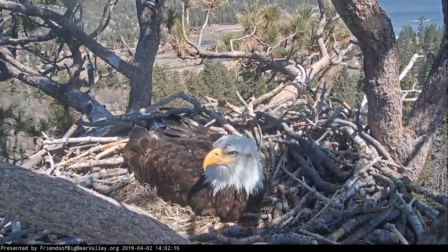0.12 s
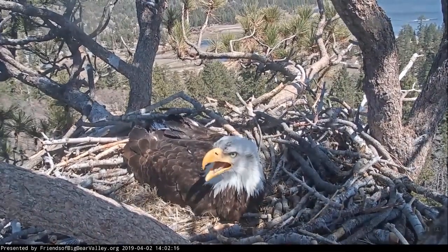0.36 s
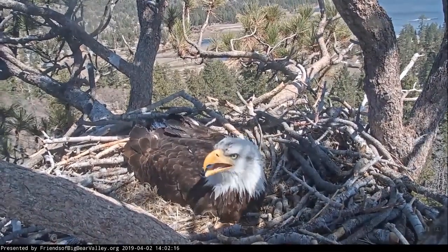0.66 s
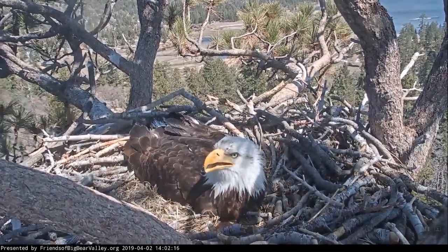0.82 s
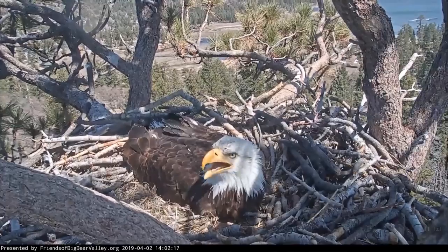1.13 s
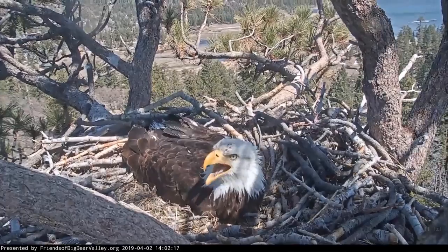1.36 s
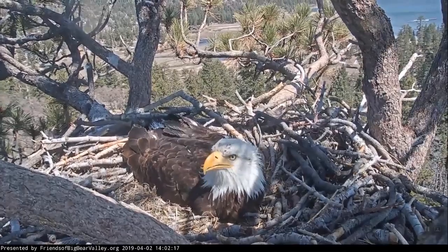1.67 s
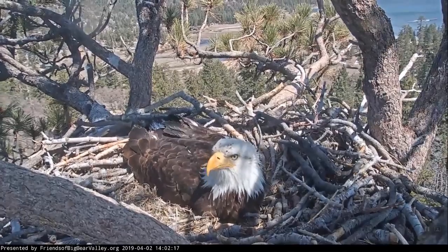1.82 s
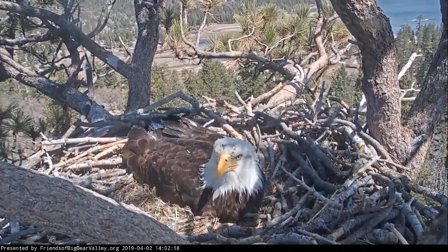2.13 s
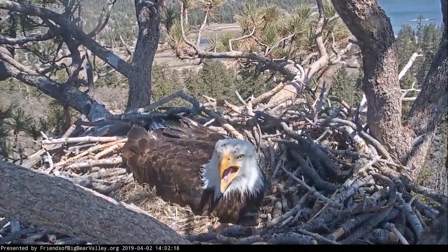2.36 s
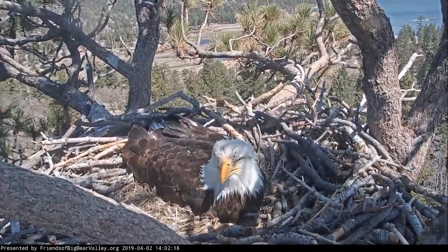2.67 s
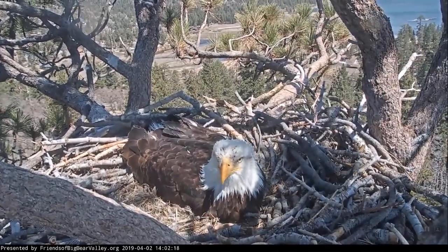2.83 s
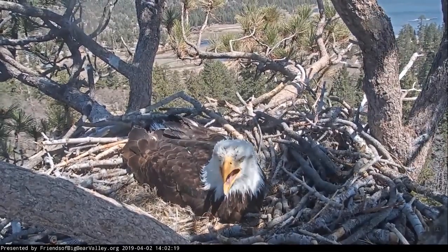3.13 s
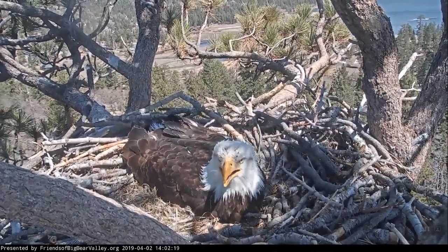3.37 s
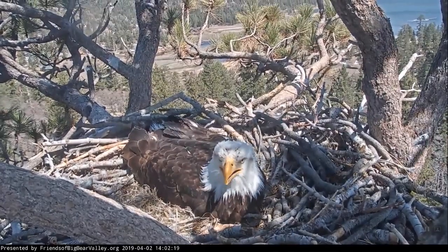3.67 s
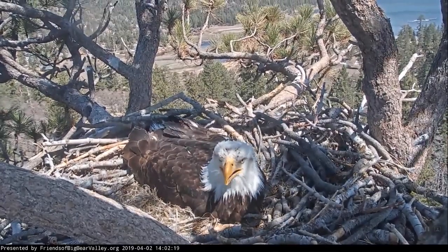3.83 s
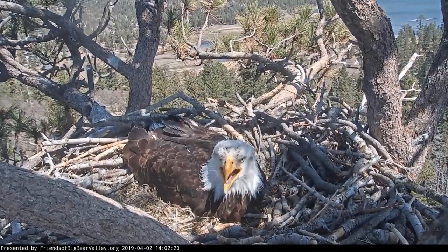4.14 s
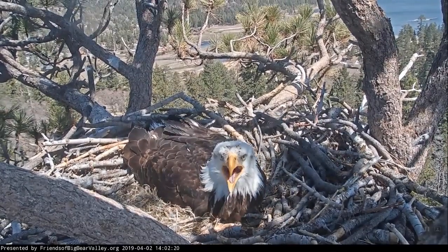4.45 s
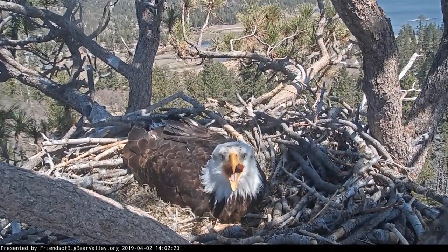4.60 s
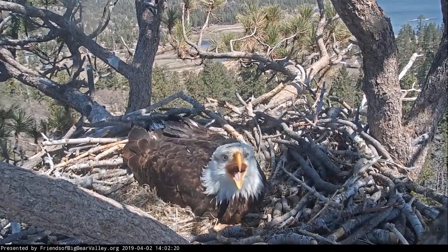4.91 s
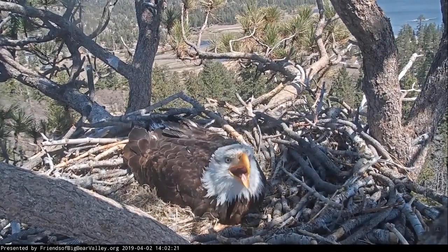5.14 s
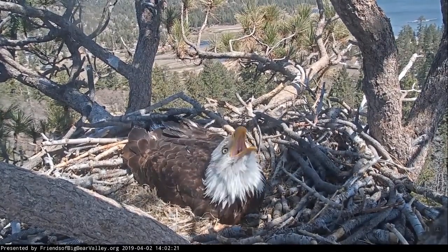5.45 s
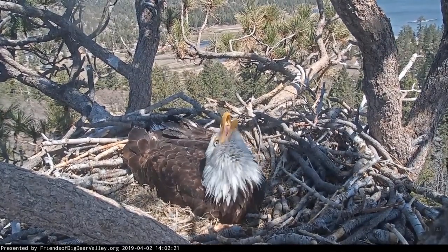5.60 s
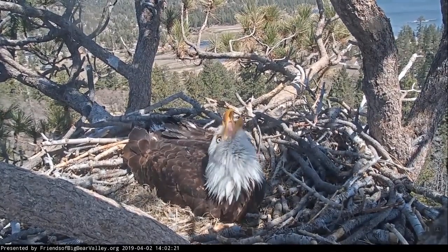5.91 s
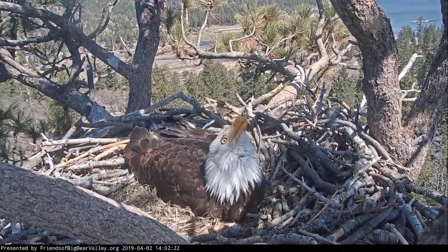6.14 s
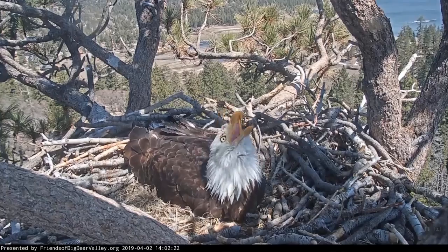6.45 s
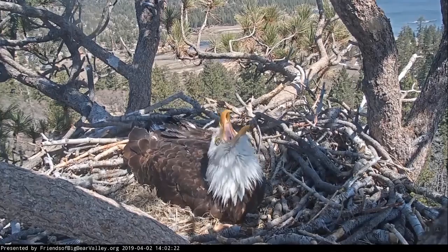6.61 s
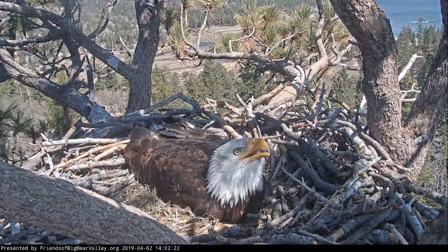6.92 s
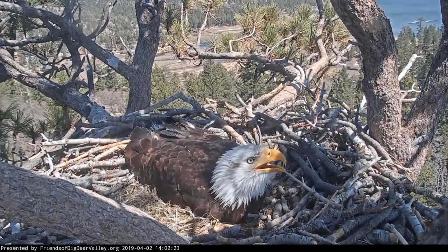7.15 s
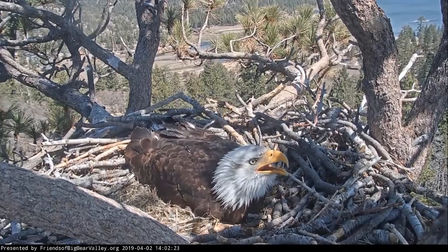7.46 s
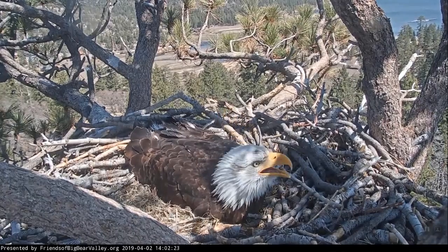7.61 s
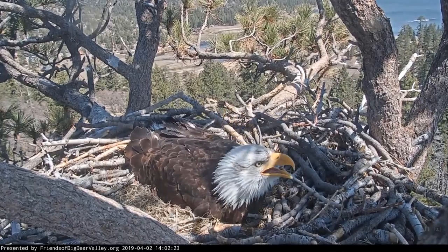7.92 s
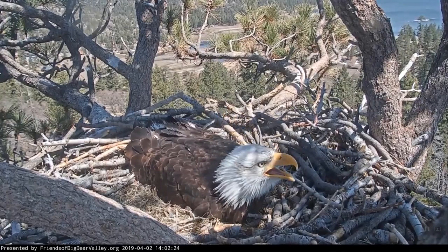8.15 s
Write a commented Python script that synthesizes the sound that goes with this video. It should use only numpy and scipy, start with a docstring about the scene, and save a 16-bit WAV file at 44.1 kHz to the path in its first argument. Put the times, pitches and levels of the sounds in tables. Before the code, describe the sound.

Over faint hiss, loud piercing eagle screams alternate with soft yips and peeps, then sharp chittering and three rattling squeals follow.

```python
"""A treetop nest in the open air: bald eagles heard through a small microphone, over faint hiss and low rumble.
One gives four loud screams that start hoarse and split to the octave below, climb, clear and drop; low yips fall among the calls.
Thin peeps are scattered from the second scream on; a raspy chitter with sharp chips, then three squeals that end in dry
rattles, follow the screams, with one dull thump. Voices are summed harmonics, gliding sines, ringing pulses and shaped noise;
hiss and rumble are coloured noise."""
import sys
import numpy as np
from scipy.fft import rfft, irfft, next_fast_len
from scipy.io import wavfile
from scipy.ndimage import uniform_filter1d, minimum_filter1d, map_coordinates

SR = 44100
rng = np.random.default_rng(int(sys.argv[2]) if len(sys.argv) > 2 else 0)


def unload_audio(sound):
    """Save the sound as a 16-bit wav file, at the path given as the first command line argument."""
    columns = np.transpose(np.atleast_2d(sound))
    # keep every value between -1 and 1, then stretch to whole-number steps
    steps = np.round(np.clip(columns, -1, 1) * 32767)
    wavfile.write(sys.argv[1], SR, steps.astype(np.int16))


N = 364707
TOP_HZ = 15650  # upper limit of the output

# Low rumble: wind, with low thumps where the screams overload the microphone.
# Each row: time in seconds, level in dB.
RUMBLE_S_DB = [(.92, -62), (1.02, -45), (1.4, -50.5), (1.53, -40), (1.63, -49), (2, -69), (2.42, -57),
               (2.56, -43), (2.7, -57.5), (3.36, -65), (3.45, -42), (3.54, -75), (5.3, -69.5), (5.55, -61),
               (5.9, -77.5), (7.1, -74.5), (7.8, -63)]
# Spectra of hiss and rumble. Each row: frequency in Hz, gain in dB.
HISS_HZ_DB = [(30, -36.5), (120, -18.5), (300, -16.5), (600, -12), (950, -7), (1250, -17), (1650, -34),
              (2100, -22), (2600, -11), (3200, -6.5), (3700, -20), (4300, -36), (4900, -51.5),
              (15000, -62.5)]
RUMBLE_HZ_DB = [(32, -3.5), (75, -15.5), (200, -24.5), (2000, -79.5)]

# Dull thump: middle in seconds, level in dB, length in seconds.
THUMP_S_DB_S = (5.8, -43, 0.015)

# Cackles, each a squeal that breaks into a rattle. Each row: first pulse in seconds, pulse spacing in seconds,
# level of each ring resonance in dB, its fade over the rattle in dB, squeal base level in dB, rasp level in dB.
CACKLES = [(5.8237, .0129, -21, 13, -48, -43), (6.2005, 0.0141, -25, 11, -44, -45),
           (6.8342, .0142, -21.5, 7, -38.5, -42)]
# Spectra of a cackle's wheeze and a rattle's knock. Each row: frequency in Hz, gain in dB.
CACKLE_HZ_DB = [(100, -30.5), (1000, -15.5), (1650, -26), (2200, -2.5), (2700, 2), (3400, 2.5),
                (4000, -14.5), (4700, -29), (7000, -45), (12000, -71)]
KNOCK_HZ_DB = [(50, -20), (160, 12), (400, 4), (1050, 3.5), (5000, -74.5)]
# Steps of a squeal. Each row: pitch in Hz, gain on the squeal base level in dB,
# middle before the rattle in seconds, length in seconds, pitch scatter as a share.
REGISTERS = [(3100, 3.5, .088, 0.032, 0.033), (4144, 0.5, 0.072, 0.035, 0.0055),
             (5040, -21.5, 0.043, 0.041, .016), (5900, -27.5, 0.033, 0.06, 0.03),
             (6780, -20.5, 0.013, 0.027, 0.04)]
# Wheeze at the start of a squeal: middle before the rattle in seconds, length in seconds, level in dB.
SQUEAL_RASP = (.083, .045, -45.5)
RATTLE_RASP_S, RATTLE_RASP_LAG_S = 0.095, 0.023  # length; middle after the first pulse
KNOCK_DB, KNOCK_FADE_DB = -44.5, 2  # alike in all rattles; fade over the pulses

# Sharp chips of the chitter. Each row: middle in seconds, level in dB, length in seconds.
CHIPS = [(4.964, -34, .018), (4.978, -21.5, 0.018), (5.004, -37, .014), (5.059, -24.5, .007),
         (5.079, -32, .012), (5.089, -34, .007), (5.112, -24, .011), (5.162, -28, .005),
         (5.1665, -22.5, .005), (5.184, -26, .007), (5.1895, -29, 0.005), (5.1993, -31, .004),
         (5.205, -37, .008), (5.295, -30, 0.0084), (5.729, -27.5, .01), (5.743, -32, .008)]
# Wheezy rasps under the chitter. Each row: middle in seconds, length in seconds, level in dB.
RASPS = [(4.986, 0.07, -41.5), (5.075, .056, -39), (5.19, .058, -40.5)]
# Spectrum of the chitter's wheeze. Each row: frequency in Hz, gain in dB.
RASP_HZ_DB = [(100, -32), (1100, -20), (1650, -31), (2400, -14), (3000, -6), (3400, 0), (3800, -10),
              (4250, -10), (4800, -35), (6000, -47), (9000, -56), (14000, -72)]
CHIP_HZ = 3320
WHEEZE_HZ, WHEEZE_DB = 4150, -6  # higher whistle inside each rasp, relative to the rasp

# Thin peeps. Each row: middle in seconds, pitch in Hz, level in dB before a common lift, length in seconds.
PEEPS = [(1.902, 3284, -44.5, .08), (2.087, 3250, -44.5, 0.045), (2.854, 3190, -38, 0.014),
         (3.079, 3120, -34.5, 0.017), (3.979, 3337, -37, 0.05), (4.251, 3263, -32.5, 0.03),
         (4.849, 3170, -37, 0.02), (4.98, 1500, -63, .08), (5.4, 3216, -40.5, 0.032),
         (5.723, 3385, -40, 0.042), (6.42, 3237, -36.5, .034), (7.287, 3210, -42, 0.016),
         (7.335, 3290, -45.5, 0.031), (7.486, 3235, -32.5, 0.019)]
PEEP_LIFT_DB = 3.0

# Short falling yips. Each row: middle in seconds, level in dB, length in seconds.
YIPS = [(1.393, -42, 0.034), (1.952, -46.5, 0.018), (2.121, -36.5, 0.033), (2.447, -37.5, 0.023),
        (2.942, -37.5, 0.035), (3.117, -36.5, 0.03), (3.719, -41, 0.017), (4.019, -36, .024),
        (5.435, -38.5, 0.019), (6.061, -37, 0.03), (7.581, -38.5, 0.025)]
# Harmonic levels of a yip. Each row: frequency in Hz, gain in dB.
YIP_HZ_DB = [(2100, 3), (3100, -1), (4200, -17), (5200, -31), (7300, -30.5), (15000, -68)]
YIP_HZ = 1039.2  # at the middle of the slide

# Screams. Each row: start, full voice, voice clears, top of the climb and end in seconds, first and top pitch in Hz,
# lead-in level in dB, full level in dB, steady octave below in dB, lead-in hoarseness 0-2, warble as a share of pitch.
SCREAMS = [(0.512, 0.649, 0.828, 0.8046, 0.8578, 1179, 1367, -31, -23, -15.5, 0.43, 0.0048),
           (1.417, 1.424, 1.5, 1.531, 1.595, 1275, 1490, -26, -21, -27, 0.7, .032),
           (2.417, 2.457, 2.54, 2.586, 2.646, 1215, 1495, -41, -21.5, -19, 1.9, .014),
           (3.354, 3.377, 3.44, 3.436, 3.492, 1286, 1448, -35, -23, -16.5, 1.1, .008)]
# Cracks, where a scream splits hard to the octave below. Each row: middle in seconds, strength in dB.
CRACKS = [(0.53, -27), (0.602, -4), (.622, -13), (0.646, -5.5), (1.469, -13), (1.492, -20), (2.424, -2),
          (2.447, 0), (2.467, -2.5), (2.489, -9), (2.527, -12.5), (3.362, -2.5), (3.38, -9.5),
          (3.421, -4.5)]
# Spectra of main tone, octave-below lines and rush of air. Each row: frequency in Hz, gain in dB.
SCREAM_HZ_DB = [(1150, -13), (1250, -12), (1400, -29), (1550, -33.5), (2300, 5.5), (3000, 1.5), (3700, -12),
                (4050, -27), (5900, -29), (7400, -43), (8700, -37.5), (11800, -35), (13500, -41),
                (15500, -68)]
SPLIT_HZ_DB = [(650, -7.5), (2100, -12), (3100, 13.5), (3550, -7), (4500, -27), (6100, -24.5), (7400, -29),
               (11500, -43), (15000, -65)]
AIR_HZ_DB = [(150, -4.5), (600, -1), (1100, -11.5), (1600, -35), (2200, -6), (3200, 2.5), (3800, -10),
             (4600, -25), (7000, -28), (14000, -35.5)]
ATTACK_S, RELEASE_S, RELEASE_DB, CUT_S = 0.012, 0.013, 22, 0.005  # quick cut-off, faint tail
OPEN_S, CLEAR_S = 0.01, 0.0019  # widths of the steps to full voice and to a clear voice
CLIMB_SHAPE, DROP_SHARE, DROP_SHAPE = 0.56, 0.24, 2.09  # climbs ever slower, drops ever faster
SWELL_DB = 3.5  # growth of the full voice over the climb
SETTLE_S, STEADY_HOARSE = 0.037, 0.21  # hoarseness dies down to a trace after full voice
CRACK_S, CRACK_HOARSE, CRACK_DIP = 0.0065, 0.6, 0.44  # the dip takes strength from the main tone
CATCH_S, CATCH_DB, CATCH_DULL_DB = 0.027, 9, 5  # the voice catches this long before its end, then is duller
WARBLE_HZ, WARBLE_S = 48.3, 0.082  # rate; decay time


def amp(db):
    """Decibels to gain."""
    return 10 ** (np.asarray(db) / 20)


def unit(x):
    """Scale to rms 1."""
    return x / np.sqrt(np.mean(x ** 2) + 1e-20)


def along(points, hz):
    """Read (Hz, value) points on a log axis."""
    f, v = np.transpose(points)
    return np.interp(np.log(hz + 1), np.log(f + 1), v)


def filtered(x, response):
    """Multiply the spectrum of x by a response of frequency."""
    m = next_fast_len(len(x) + 8192)
    gain = response(np.fft.rfftfreq(m, 1 / SR))
    return irfft(rfft(x, m) * gain, m)[:len(x)]


def noise(n, colour):
    """Noise of rms 1 with a (Hz, dB) colour."""
    return unit(filtered(rng.standard_normal(n), lambda hz: amp(along(colour, hz))))


def band(hz, centre_hz, width_hz):
    """Steep-sided band; a low-pass when centred on 0 Hz."""
    return 1 / (1 + ((hz - centre_hz) / width_hz) ** 4) ** 1.5


def wobble(n, rate_hz):
    """Smooth random curve through rate_hz knots a second."""
    knots = rng.standard_normal(int(n * rate_hz / SR) + 4)
    return map_coordinates(knots, [np.arange(n) * rate_hz / SR])


def turns(hz):
    """Phase in radians of a gliding tone."""
    return 2 * np.pi * np.cumsum(hz) / SR


def swell(length_s):
    """Position -1..1 through a short note, and its rounded envelope."""
    u = np.linspace(-1, 1, max(int(length_s * SR), 64))
    return u, np.cos(u * np.pi / 2)


def ease(t, middle_s, width_s):
    """Smooth step from 0 to 1."""
    return 0.5 + 0.5 * np.tanh((t - middle_s) / width_s)


def add(out, start_s, x):
    """Mix x into out from start_s on."""
    i = max(round(start_s * SR), 0)
    out[i:i + len(x)] += x[:len(out) - i]


def whistle(hz, length_s, fall, scatter, flutter_db, overtone_db):
    """Nearly pure note that sags and flutters."""
    u, env = swell(length_s)
    phase = turns(hz * (1 - fall * u + scatter * wobble(len(u), 700)))
    flutter = unit(amp(flutter_db * wobble(len(u), 330)))
    overtone = amp(overtone_db) * env * np.sin(2 * phase)
    return env * flutter * (np.sin(phase) + overtone)


def rasp(length_s, colour, grain_db):
    """Wheeze: noise of uneven strength, coloured by the throat."""
    u, env = swell(length_s)
    bursts = rng.standard_normal(len(u)) * amp(grain_db * wobble(len(u), 414.3))
    return env * unit(filtered(bursts, lambda hz: amp(along(colour, hz))))


def background(hiss_db=-54):
    """Steady hiss in the microphone's two resonances; low rumble of wind and of screams overloading it."""
    rumble_db = np.interp(np.arange(N) / SR, *np.transpose(RUMBLE_S_DB))
    rumble = amp(rumble_db + 0.62 * wobble(N, 13)) * noise(N, RUMBLE_HZ_DB)
    return amp(hiss_db) * noise(N, HISS_HZ_DB) + rumble


def thump(edge_hz=190):
    """Dull thump just before the first rattle: a short burst of low-passed noise."""
    out = np.zeros(N)
    middle_s, db, length_s = THUMP_S_DB_S
    u, env = swell(length_s)
    low = filtered(rng.standard_normal(len(u)), lambda hz: band(hz, 0, edge_hz))
    add(out, middle_s - length_s / 2, amp(db) * env * unit(low))
    return out


def rattles(count=5, ring_t60_s=0.015, knock_t60_s=0.064, scatter_s=0.00026, edge_hz=4600):
    """Slow separate pulses of the voice ring two throat resonances over a low knock and a wheeze."""
    out, t = np.zeros(N), np.arange(SR // 20) / SR
    attack = 1 - np.exp(-(t / 0.0006) ** 2)
    for first_s, spacing_s, db, fade_db, _, rasp_db in CACKLES:
        for k in range(count):
            late = (k / (count - 1)) ** 2
            ring = sum(np.sin(2 * np.pi * hz * (1 + 0.023 * rng.normal()) * t) for hz in (2800, 3300))
            ring_gain = amp(db - fade_db * late - 60 * t / ring_t60_s)
            knock_gain = amp(KNOCK_DB - KNOCK_FADE_DB * late - 60 * t / knock_t60_s)
            pulse = attack * (ring_gain * ring + knock_gain * noise(len(t), KNOCK_HZ_DB))
            add(out, first_s + k * spacing_s + scatter_s * rng.normal(), pulse)
        wheeze = rasp(RATTLE_RASP_S, CACKLE_HZ_DB, grain_db=0)
        add(out, first_s + RATTLE_RASP_LAG_S - RATTLE_RASP_S / 2, amp(rasp_db) * wheeze)
    return filtered(out, lambda hz: 1 / (1 + (hz / edge_hz) ** 10))


def squeals(fall=0.02, overtone_db=-35):
    """Before each rattle a squeal jumps up through the registers of the throat, sagging on each."""
    out = np.zeros(N)
    for first_s, _, _, _, db, _ in CACKLES:
        for hz, step_db, lead_s, length_s, scatter in REGISTERS:
            note = whistle(hz, length_s, fall, scatter, flutter_db=5.0, overtone_db=overtone_db)
            add(out, first_s - lead_s - length_s / 2, amp(db + step_db) * note)
        lead_s, length_s, rasp_db = SQUEAL_RASP
        wheeze = rasp(length_s, CACKLE_HZ_DB, grain_db=8.5)
        add(out, first_s - lead_s - length_s / 2, amp(rasp_db) * wheeze)
    return out


def chitter():
    """Sharp chips break out of a hoarse, whistling wheeze."""
    out = np.zeros(N)
    for middle_s, db, length_s in CHIPS:
        chip = whistle(CHIP_HZ, length_s, fall=0.0062, scatter=0.03, flutter_db=4.5, overtone_db=-41)
        add(out, middle_s - length_s / 2, amp(db) * chip)
    for middle_s, length_s, db in RASPS:
        high = whistle(WHEEZE_HZ, length_s, fall=0.023, scatter=0.02, flutter_db=7.5, overtone_db=-32)
        wheeze = amp(WHEEZE_DB) * high + rasp(length_s, RASP_HZ_DB, grain_db=5.5)
        add(out, middle_s - length_s / 2, amp(db) * wheeze)
    return out


def peeps():
    """Thin soft whistles: nearly pure, slightly sagging tones."""
    out = np.zeros(N)
    for middle_s, hz, db, length_s in PEEPS:
        peep = whistle(hz, length_s, fall=0.021, scatter=0.007, flutter_db=4.0, overtone_db=-47.0)
        add(out, middle_s - length_s / 2, amp(db + PEEP_LIFT_DB) * peep)
    return out


def yips(fall=0.08, jitter=0.012):
    """Each yip slides down; its upper harmonics bloom only in the middle."""
    out = np.zeros(N)
    for middle_s, db, length_s in YIPS:
        u, env = swell(length_s)
        pitch_hz = YIP_HZ * (1 - fall * u + jitter * wobble(len(u), 407))
        phase = turns(pitch_hz)
        bloom = env ** 3 * amp(2 * min(db + 35, 0))  # weaker in soft yips
        voice = np.zeros(len(u))
        for k in range(1, 15):
            gain = amp(along(YIP_HZ_DB, k * pitch_hz)) * (bloom if k > 3 else 1)
            voice += gain * np.sin(k * phase + rng.uniform(0, 2 * np.pi))
        add(out, middle_s - length_s / 2, amp(db) * env * voice)
    return out


def scream(row, full_db=-20.5, flicker_db=3.0, tremor=0.0095, slip_rad=0.43, air_db=-34,
           hoarse_air_db=9, shimmer_db=1.5, fray_rad=0.45, voice_lift_db=2.0):
    """The throat favours the second harmonic; period doubling puts lines halfway between harmonics."""
    (start_s, full_s, clears_s, top_s, end_s, first_hz, top_hz,
     lead_db, loud_db, split_db, hoarse, warble) = row
    t = np.arange(start_s, end_s, 1 / SR)
    n, since_s = len(t), t - start_s

    climb = np.clip(since_s / (top_s - start_s), 0, 1)
    drop = np.clip((t - top_s) / (end_s - top_s), 0, 1)
    pitch_hz = first_hz + (top_hz - first_hz) * climb ** CLIMB_SHAPE
    pitch_hz = pitch_hz * (1 - DROP_SHARE * drop ** DROP_SHAPE)

    opened, cleared = ease(t, full_s, OPEN_S), ease(t, clears_s, CLEAR_S)
    caught = ease(t, end_s - CATCH_S, CLEAR_S)
    crack = sum(amp(strength_db) * np.exp(-((t - s) / CRACK_S) ** 2) for s, strength_db in CRACKS)

    db = lead_db + (loud_db - SWELL_DB * (1 - climb) - lead_db) * opened
    db = db - RELEASE_DB * ease(t, end_s - RELEASE_S, CUT_S)
    db = db - CATCH_DB * (np.sin(np.pi * caught) + caught / 2)

    lead_in = hoarse * np.exp(-np.maximum(t - full_s, 0) / SETTLE_S)
    ragged = np.minimum(STEADY_HOARSE + lead_in + CRACK_HOARSE * crack, 2)
    # below full force the highest overtones fade, except in a crack
    weak_db = np.clip(full_db - db, 0, 20) * (1 - np.tanh(2 * crack)) + CATCH_DULL_DB * caught

    warbling = warble * np.exp(-since_s / WARBLE_S) * np.sin(2 * np.pi * WARBLE_HZ * since_s)
    phase = turns(pitch_hz * (1 + tremor * ragged * wobble(n, 400) - warbling))
    flicker = amp(flicker_db * (ragged + 1.0) * wobble(n, 130))
    split = np.tanh((amp(split_db) * (1 - cleared) + crack) * flicker)
    # the doubled period slips against the main one, smearing its lines
    slip = slip_rad * ragged * wobble(n, 400)

    voice = np.zeros(n)
    for k in range(1, 23):  # half-harmonics: odd k are the octave-below lines
        hz, high = pitch_hz * k / 2, k > 6
        if k % 2:
            gain = split * amp(along(SPLIT_HZ_DB, hz))
        else:
            gain = (1 - CRACK_DIP * split) * amp(along(SCREAM_HZ_DB, hz))
        gain = gain * amp(-weak_db * high * (hz / TOP_HZ + 1.0))
        # each high overtone frays on its own
        fray = high * fray_rad * hz / TOP_HZ * wobble(n, 900)
        voice += gain * np.sin(k / 2 * phase + k % 2 * slip + fray + rng.uniform(0, 2 * np.pi))

    air = amp(air_db + hoarse_air_db * ragged) * noise(n, AIR_HZ_DB)
    edges = np.minimum(since_s / ATTACK_S, 1) ** 2 * np.minimum((end_s - t) / CUT_S, 1)
    level = amp(db + shimmer_db * ragged * wobble(n, 150))
    return edges * level * (amp(voice_lift_db) * voice + air)


def screams():
    """The screams, each at its moment."""
    out = np.zeros(N)
    for row in SCREAMS:
        add(out, row[0], scream(row))
    return out


def scene():
    """The birds, close and dry, in the open air."""
    birds = rattles() + squeals() + chitter() + peeps() + yips() + screams()
    return (background() + thump() + birds)[None]


def record(dry, lean=0.006, grit=0.0034, crackle=0.002, thud_hz=280):
    """Fast limiter; peaks past the knee overload lopsidedly, with a low thump, and crackle when sudden."""
    ceiling, knee = 0.135, 0.05
    needed = ceiling / np.maximum(np.abs(dry[0]), ceiling)
    x = dry[0] * uniform_filter1d(minimum_filter1d(needed, size=90), size=60)
    # only upward peaks overload, so their mean pushes the signal off centre
    over = np.clip(x / knee - 1, 0, 1)
    sudden = over * np.clip(1 - 6 * uniform_filter1d(over, size=SR // 25), 0.2, 1)
    thud = filtered(over, lambda hz: band(hz, 0, thud_hz))
    x = x + lean * thud * (1 + 0.59 * wobble(N, 91) + 0.2 * wobble(N, 450))
    rough = sudden * (grit + crackle * rng.standard_normal(N))
    x = x + filtered(rough, lambda hz: band(hz, 9000, 4700))
    return filtered(x, lambda hz: hz < TOP_HZ)[None]


dry = scene()
out = record(dry)
unload_audio(out)
```